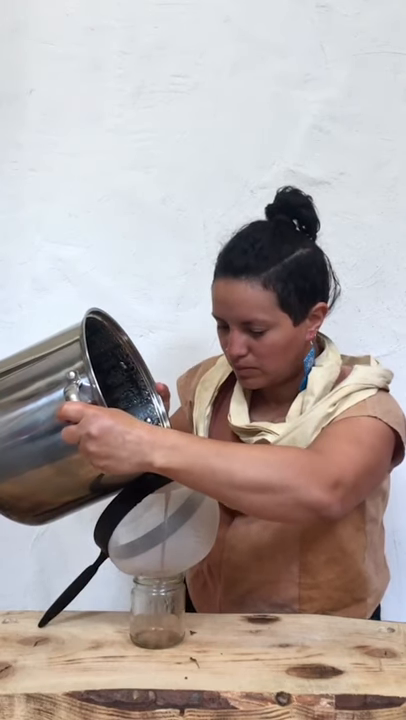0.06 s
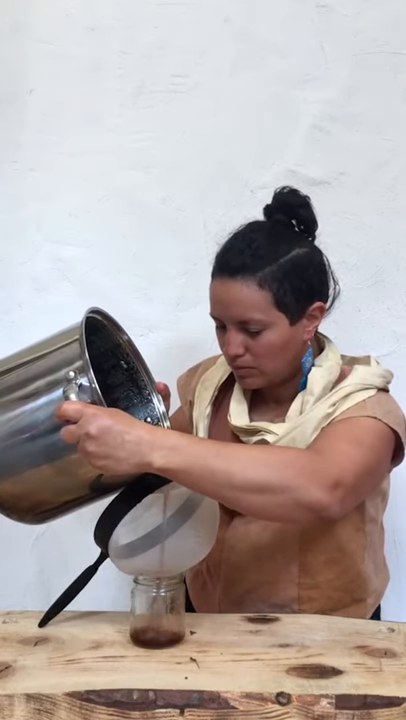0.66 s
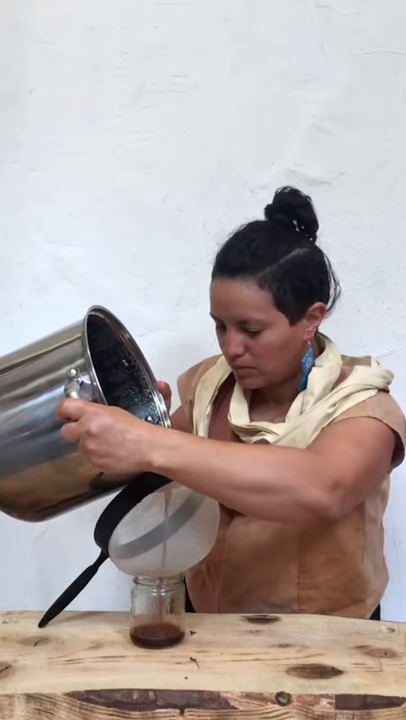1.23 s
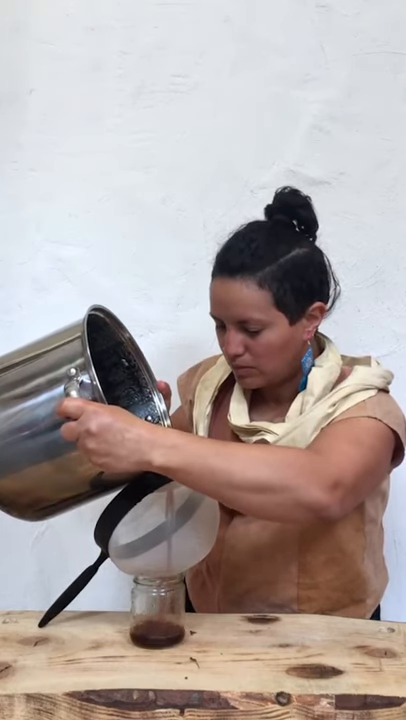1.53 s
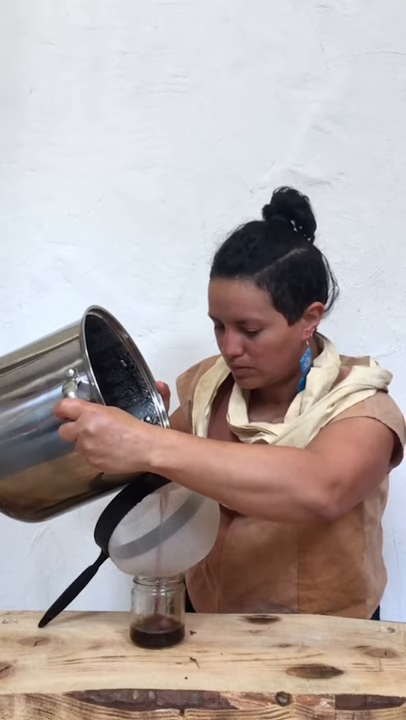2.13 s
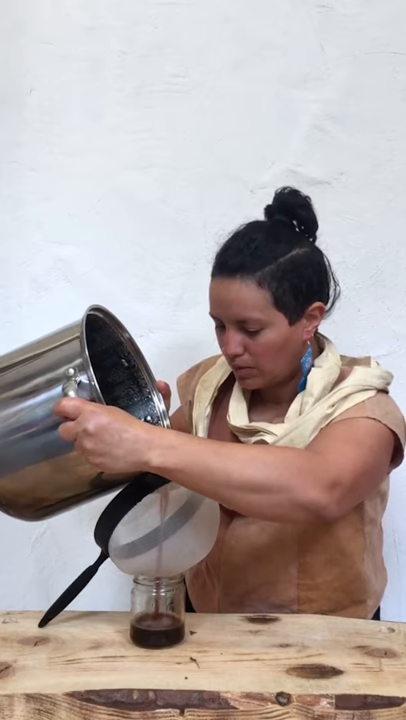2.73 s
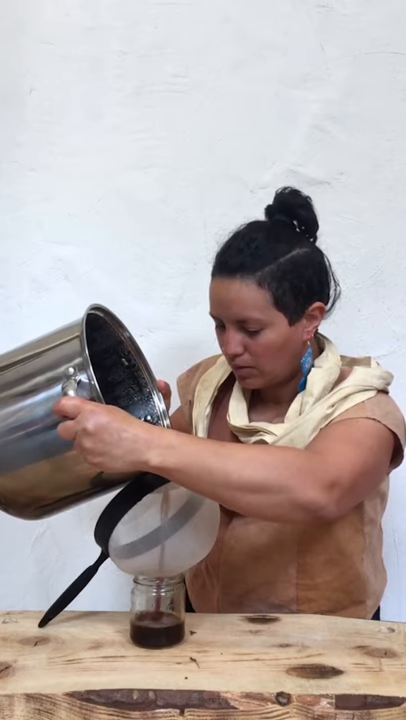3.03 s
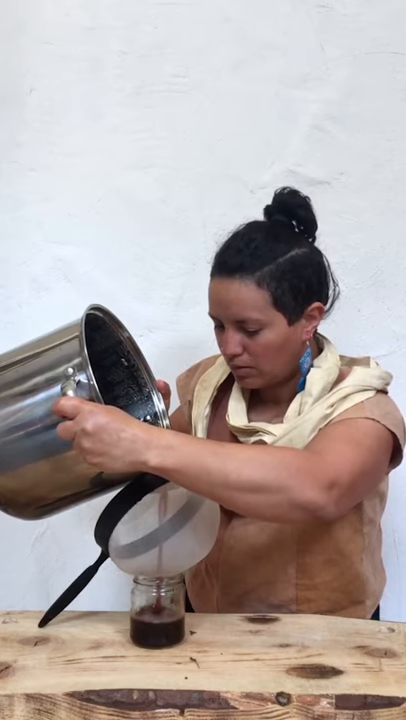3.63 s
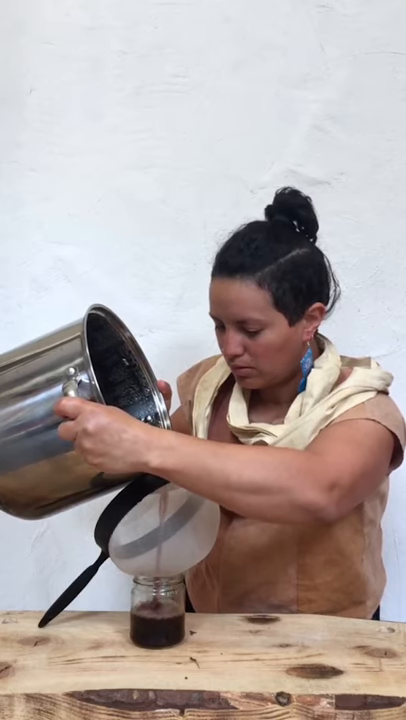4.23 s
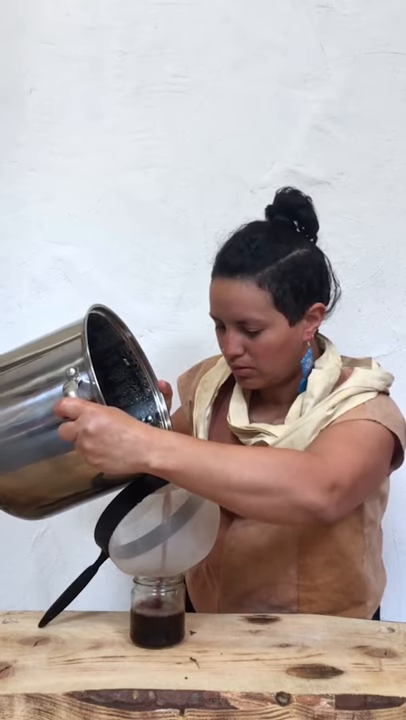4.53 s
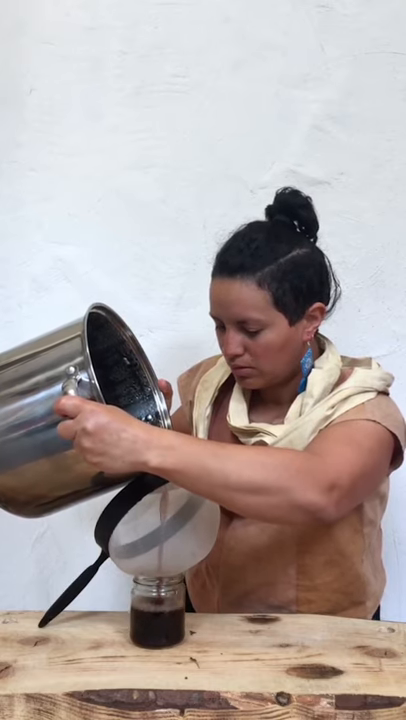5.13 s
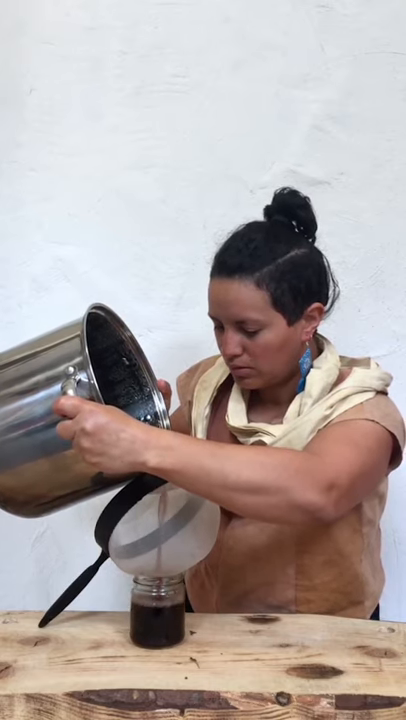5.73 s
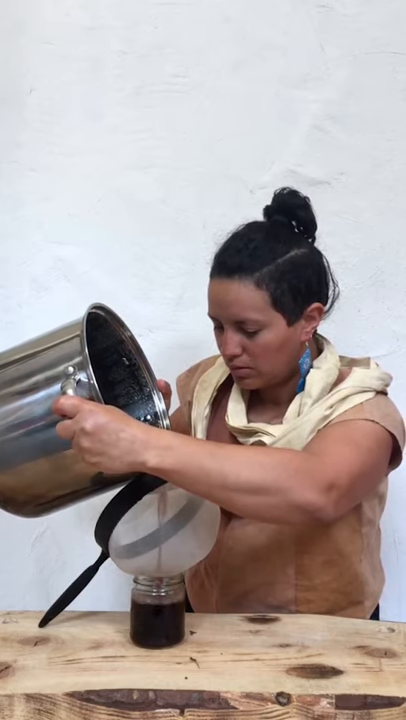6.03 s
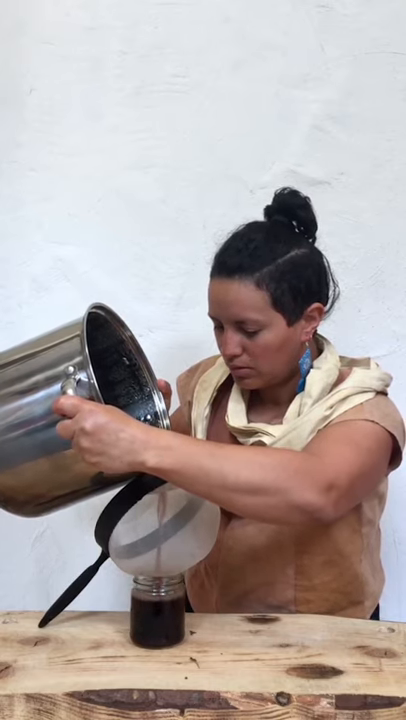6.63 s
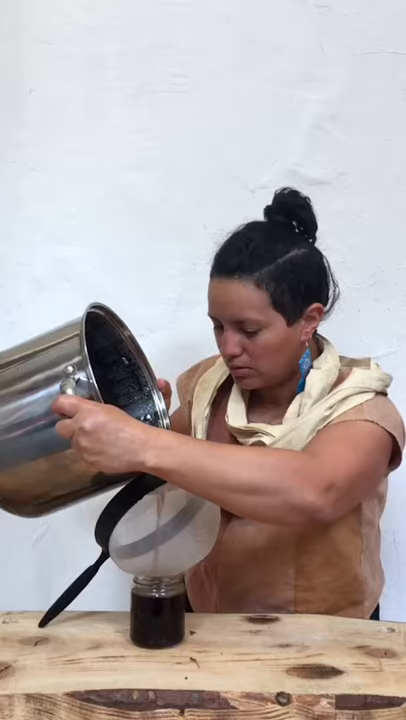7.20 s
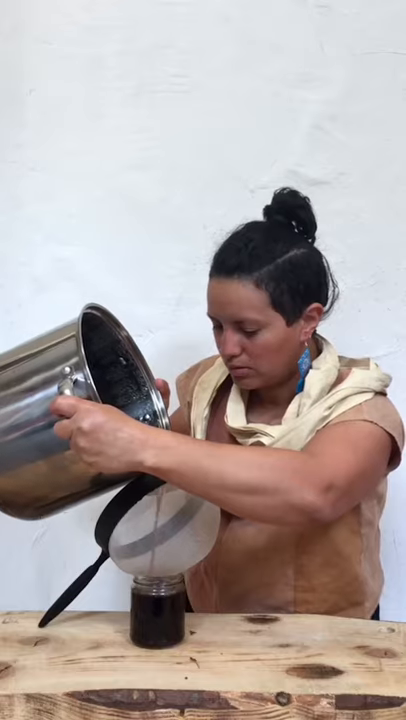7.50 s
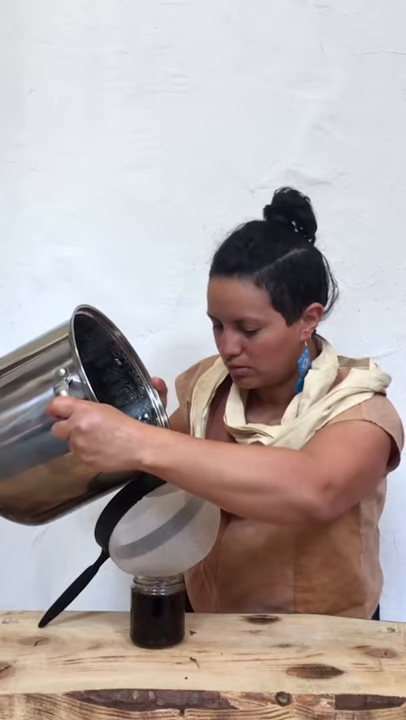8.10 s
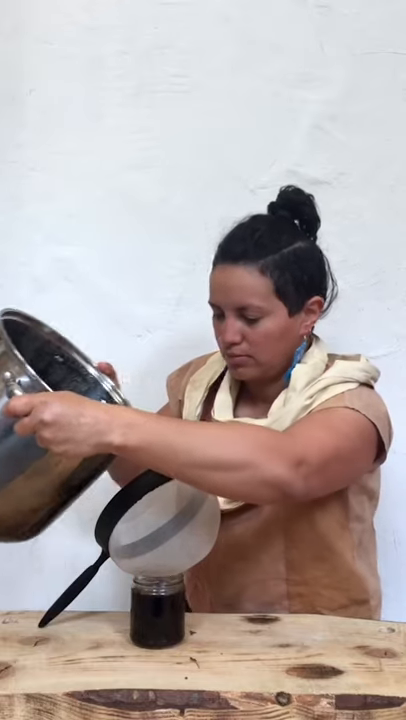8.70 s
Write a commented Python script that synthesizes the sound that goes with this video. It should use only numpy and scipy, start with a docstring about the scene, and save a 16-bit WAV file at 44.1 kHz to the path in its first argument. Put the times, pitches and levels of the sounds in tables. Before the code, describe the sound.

A thin stream of liquid pours from a steel pot through a strainer and funnel into a glass jar, heard close. It starts faintly, with light drops ticking from about 0.5 seconds and sharp, bright spatters on bare glass between 1.5 and 2 seconds. From about 2.2 seconds the pour is at its loudest, a quick run of hollow gulps and bubbles with a fine fizz, faint ringing from the jar and pot, and a soft low drumming. From around 4 seconds the gurgling gets lighter and its pitch climbs as the jar fills. After 6 seconds it thins to a trickle with high, plinking droplets. The stream falters near 7.2 seconds, gives a few last plops and drips, and dies away by 8 seconds. A faint low handling rumble follows around 8.5 seconds. Soft room noise and a slight electrical hum continue throughout.

```python
"""Pouring into a glass jar

A thin stream runs from a steel pot through a strainer and funnel into a jar on a wooden table.
It spatters on the bare glass, then traps air: each gulp rings a low hollow note and the shrinking
air space of the jar. Drops smack, small bubbles tick and fizz, and the pot rings along faintly.
The stream ends in a few drips. Behind it all is a quiet room with a mains hum."""
import sys
import numpy as np
from scipy import signal
from scipy.fft import rfft, irfft, next_fast_len
from scipy.io import wavfile
from scipy.ndimage import uniform_filter1d

SR = 44100
rng = np.random.default_rng(int(sys.argv[2]) if len(sys.argv) > 2 else 0)


def digitize_waveform(pressure):
    """Quantize a signal to 16-bit integers and store it at the path in sys.argv[1].

    Rows of a 2-D input are taken as channels; values are limited to [-1, 1].
    """
    field = np.atleast_2d(pressure).T
    bounded = np.clip(field, -1, 1)
    quanta = np.round(bounded * 32767).astype(np.int16)
    wavfile.write(sys.argv[1], SR, quanta)


N = 390726
TIME = np.arange(N) / SR
SWELL_S = .0008   # how quickly a gulp's ring builds up

# Gulps, the big trapped pockets of air:
# (time [s], low ring level [dB], high ring level [dB], low pitch [Hz], high pitch [Hz], low decay [s])
GULPS = [(0.6803, -46, -37, 756, 1320, 0.014), (1.483, -43, -37, 790.0, 1260, 0.0053),
         (1.6625, -31.5, -28.5, 800, 1136, 0.0074), (1.8883, -25.5, -24, 860, 1076, 0.0057),
         (1.971, -35, -29, 805, 1346, 0.013), (2.1216, -31, -38, 846, 1210, 0.013),
         (2.224, -36, -34.5, 855, 1055, 0.018), (2.23, -34, -31.5, 920, 1010, 0.016),
         (2.301, -13, -33, 869, 1025, 0.008), (2.3306, -28, -48, 878, 1080, 0.025),
         (2.362, -22.5, -44, 903, 1050, 0.012), (2.4133, -19, -29, 835, 1062, 0.012),
         (2.433, -15, -45, 795, 1050, 0.0065), (2.4641, -22.5, -46, 836, 1080, 0.012),
         (2.488, -18.5, -51, 850, 1020, 0.0073), (2.5184, -24.5, -49, 840, 1050, 0.011),
         (2.653, -22, -33, 833, 970, 0.013), (2.6852, -31, -54, 874, 1000, 0.019),
         (2.7477, -26.5, -39, 828, 1010, 0.024), (2.7678, -21, -48, 858, 1000, 0.008),
         (2.79, -24, -36, 848, 1030, 0.0087), (2.941, -31, -36, 820, 1005, 0.014),
         (2.9676, -21.5, -36, 890, 1025, 0.0072), (2.995, -29.5, -51, 882, 980, 0.016),
         (3.033, -17, -26, 785, 1050, 0.0068), (3.1404, -26, -33, 678, 950, 0.013),
         (3.1727, -18, -26.5, 670, 954, 0.0072), (3.1936, -35, -29.5, 693, 893, 0.022),
         (3.237, -30, -35, 658, 907, 0.03), (3.2824, -22, -29, 628, 940, 0.0081),
         (3.363, -23, -31, 750, 960, 0.014), (3.4023, -25.5, -23, 725, 934, 0.0067),
         (3.4124, -24, -32, 659.0, 887.0, 0.013), (3.443, -21, -40, 619, 950, 0.016),
         (3.498, -23, -39, 602, 1000, 0.01), (3.56, -30, -32.5, 675, 1000, 0.012),
         (3.575, -29, -31, 697, 1023, 0.011), (3.597, -37, -36, 710, 1050, 0.0097),
         (3.683, -22.5, -33.5, 662, 1023, 0.011), (3.712, -26, -37, 630, 940, 0.0055),
         (3.746, -32, -34.5, 610, 1000, 0.0078), (3.7768, -22, -26.5, 630, 1010, 0.009),
         (3.798, -28, -34, 610, 1210, 0.0086), (3.824, -32, -29.5, 590, 1055, 0.0089),
         (3.8354, -22, -27, 580, 1030, 0.012), (3.8549, -23.5, -34, 556, 1016, 0.008),
         (3.863, -30, -29.5, 608, 950, 0.02), (3.888, -30.5, -37, 606, 1014, 0.019),
         (3.986, -18, -29.5, 559, 1006, 0.0094), (4.029, -34, -33.5, 590, 1080, 0.0087),
         (4.048, -24, -34, 550, 1230, 0.0052), (4.0576, -28.5, -37, 591, 1040, 0.017),
         (4.105, -32, -22.0, 550, 1016, 0.0085), (4.1766, -33.5, -29.5, 587.0, 1080, 0.011),
         (4.275, -32, -29, 592, 1080, 0.012), (4.3393, -40, -32.5, 603, 1176, 0.011),
         (4.4317, -34.5, -28.5, 575, 1103, 0.029), (4.4643, -29, -26.5, 544, 1110, 0.011),
         (4.496, -43, -28, 540, 1076, 0.017), (4.563, -36, -33.5, 560, 1079, 0.035),
         (4.634, -28, -25, 518, 1180, 0.011), (4.6796, -28.5, -22, 560.0, 1082, 0.012),
         (4.744, -45, -36, 560, 1104, 0.024), (4.788, -45, -28.5, 560, 1144, 0.0097),
         (4.8215, -44, -29, 546, 1186, 0.016), (4.8395, -30.5, -27, 560, 1076, 0.0088),
         (4.887, -43, -29, 533.0, 1196, 0.0099), (4.957, -26.5, -26.5, 535, 1207, 0.011),
         (4.99, -45.0, -26.5, 604, 1274, 0.0075), (5.0245, -33, -33, 543, 1030, 0.0086),
         (5.0816, -35.5, -39, 574, 990, 0.019), (5.127, -38, -41, 584, 1350, 0.012),
         (5.1704, -30, -30.5, 553.0, 1250, 0.0093), (5.241, -31, -26, 525, 1050, 0.013),
         (5.257, -27, -30, 540, 1110, 0.0062), (5.304, -37, -42, 540, 1180, 0.01),
         (5.4175, -41, -33, 677, 1087, 0.017), (5.478, -31.5, -23.5, 580, 1286, 0.0063),
         (5.546, -37, -34, 638, 1312, 0.019), (5.6557, -32, -27, 560, 1280, 0.011),
         (5.685, -42, -34, 596, 1435, 0.011), (5.76, -37, -47, 573, 1320, 0.0054),
         (5.81, -26.5, -31.5, 574, 1400, 0.015), (5.85, -36, -21.5, 560, 1300, 0.0046),
         (6.533, -51, -27.5, 594, 1510, 0.0044), (6.594, -54, -32, 590, 1487, 0.011),
         (6.834, -57.0, -32.5, 614, 1620, 0.0063), (7.5234, -38, -42.5, 600, 1040, 0.01),
         (7.68, -34, -44.5, 611, 1040, 0.013), (7.7337, -26.5, -37, 670, 1030, 0.0083)]
# The funnel's hollow notes: (pitch [Hz], width [Hz], level [dB])
FUNNEL_NOTES = [(273, 34, 5.5), (306, 49, 17.5)]


def gulps(second_db=-18, snap_db=-23, jolt_db=-12, splash_db=-25):
    """Each air pocket snaps shut, rings two notes, jolts the funnel and throws up a little spray."""
    rings, jolts, splashes, snaps = np.zeros((4, N))
    for s, low_db, high_db, low_hz, high_hz, decay_s in GULPS:
        low_rise, high_rise = rng.normal(.3, 1.0, 2)
        add(rings, s, from_db(low_db) * plop(low_hz, decay_s, low_rise))
        add(rings, s, from_db(high_db) * plop(high_hz, .77 * decay_s, high_rise))
        # a smaller pocket pinches off just after the first
        lag_s = rng.uniform(.010, .026)
        detune = np.exp(rng.normal(0, .067))
        for db, hz in (low_db, low_hz), (high_db, high_hz):
            add(rings, s + lag_s, from_db(db + second_db) * plop(hz * detune, .008, 0))
        add(snaps, s + SWELL_S, from_db(max(low_db, high_db) + snap_db) * crackle(.0023))
        # the deepest gulps jolt the funnel hardest: 9 dB more for each octave down
        force_db = (low_db + high_db) / 2 - 9 * np.log2(low_hz / 560)
        add(jolts, s, from_db(force_db + jolt_db) * crackle(.015))
        add(splashes, s, from_db(high_db + splash_db + rng.normal(0, 3)) * crackle(.016))
    funnel = band(1.13 * body(jolts, FUNNEL_NOTES), 250, 410)
    splatter = band(splashes, 1500, 8000) + 2 * band(snaps, 1250, 2000)
    return band(rings, 260, 1960, order=3) + funnel + splatter


def lulls(depth_db=5, half_width_s=.016):
    """A volume curve: churn and fizz dip just before each gulp, while its pocket of air forms."""
    dips = np.zeros(N)
    for s, *_ in GULPS:
        add(dips, s - 2.7 * half_width_s, np.hanning(int(3 * half_width_s * SR)))
    return from_db(-depth_db * np.minimum(dips, 1))


# Notes of the air as the jar fills: (time [s], hollow note [Hz], jar air note [Hz], overtone [Hz])
FILLING_NOTES = [(1.9, 836, 1330, 2670), (2.35, 855, 924, 2960), (2.95, 831, 820, 3140),
                 (3.2, 728, 860, 3250), (3.6, 656, 856, 3570), (4.0, 575, 1137, 3130),
                 (5.0, 547, 1130, 2980), (5.35, 560, 1190, 3000), (5.5, 612, 1256, 3180),
                 (5.8, 565, 1270, 3070), (6.5, 633, 1550, 3190), (6.9, 597, 1670, 3240),
                 (7.15, 596, 2070, 2670), (7.45, 638, 1710, 2640), (7.8, 590, 1800, 2400)]
# How loud the bubbling between gulps is: (time [s], hollow note level [dB], jar air level [dB])
CHURN_LEVELS = [(1.3, -60, -65), (2.22, -42.5, -43), (2.47, -34.5, -57), (3.38, -39.5, -38),
                (3.54, -45.5, -42), (4.0, -45, -49.5), (4.13, -44.5, -47.5), (4.68, -39.5, -40.5),
                (5.2, -47.5, -45.5), (5.75, -46, -46), (5.99, -57.5, -56.5), (6.8, -59, -48.5),
                (7.39, -56.5, -51), (7.62, -46.5, -49), (7.9, -61, -52)]
# Bubbles get fewer once the stream thins: (time [s], bubbles [per s])
BUBBLE_RATE = [(5.7, 220), (6.2, 110)]
# How much of the stream reaches the pool; it falters before the last drips: (time [s], amount [share])
STREAM_FLOW = [(1.3, 0), (1.9, 0.87), (7.16, 0.8), (7.22, 0.29), (7.36, 0.25), (7.42, 0.81), (7.76, 0.7),
               (7.9, 0.13), (8.05, 0.05)]


def churn(air_gain_db=.5, overtone_db=-19):
    """Countless small bubbles keep the jar's air ringing; its note climbs and blurs as the jar fills."""
    hollow_hz, air_hz, overtone_hz = in_time(FILLING_NOTES)
    hollow_db, air_db = in_time(CHURN_LEVELS)
    per_s, = in_time(BUBBLE_RATE)
    flow, = in_time(STREAM_FLOW)
    blur = np.interp(TIME, [3.5, 6.0, 7.3], [.035, .055, .11])
    wander = np.interp(TIME, [2.9, 3.4], [.028, .058])
    bubbles = random_clicks(per_s, 3.0) * from_db(3 * wobble(20))
    hollow = from_db(hollow_db) * moving_ring(bubbles, hollow_hz * np.exp(wander * wobble(26.2)), 39.3)
    air = from_db(air_db + air_gain_db) * moving_ring(bubbles, air_hz * np.exp(blur * wobble(20.5)), 172)
    overtone = from_db(hollow_db + overtone_db) * moving_ring(random_clicks(300, 8.9), overtone_hz, 110)
    return flow * (lulls() * (hollow + air) + overtone)


# The loudest droplets and small bubbles: (time [s], level [dB], pitch [Hz])
DROPLETS = [(0.472, -41, 7030), (0.6557, -31.5, 3150), (0.78, -28.5, 4170), (0.784, -37, 6700),
            (0.872, -38, 9100), (0.9052, -35, 2070), (0.945, -39, 10750), (1.152, -36, 9950),
            (1.167, -30.5, 6880), (1.26, -36, 4100), (1.283, -35, 4420), (1.396, -34, 4100),
            (1.3974, -28, 7220), (1.433, -36, 6000), (1.485, -31.5, 7000), (1.5736, -23, 2760),
            (1.721, -23, 4260), (1.7477, -26, 2540), (1.849, -26, 7140), (1.9307, -32, 2860),
            (1.97, -32, 8560), (2.1145, -31.5, 4310), (2.155, -26.5, 6010), (2.361, -37, 3130),
            (2.5207, -29, 2830), (2.7811, -33.5, 3100), (2.8378, -32.5, 4430), (2.923, -36.5, 4550),
            (2.965, -31, 3125), (3.365, -36, 2850), (3.5771, -38, 4520), (3.5987, -34.5, 3360),
            (3.6292, -36, 3570), (3.712, -30.5, 3740), (3.7499, -36, 3930), (3.851, -38.5, 5540),
            (3.897, -42, 4750), (3.997, -35.5, 4860), (4.012, -32, 3230), (4.222, -36, 3050),
            (4.7606, -34, 4260), (5.415, -27.5, 3370), (5.479, -27, 2700), (5.662, -28, 2300),
            (5.69, -32.5, 3050), (5.695, -35.5, 6130), (5.8514, -31.5, 2660), (5.9263, -30, 1980),
            (6.1978, -28, 3030), (6.3595, -28, 3330), (6.3665, -29.5, 3730), (6.557, -26, 3710),
            (6.6342, -32, 3120), (6.6705, -34, 1705), (6.75, -28.5, 3310), (6.778, -32, 3400),
            (6.832, -36, 1930), (6.897, -28, 1870), (6.963, -26, 2560), (7.107, -25, 2460),
            (7.1447, -21.5, 2390), (7.428, -30.5, 3430), (7.4686, -22.5, 2440), (7.5008, -32.5, 3350),
            (7.545, -36, 1655), (7.5762, -42, 2380), (7.679, -24, 2405), (7.714, -30.5, 2350)]


def droplets(ring_s=.0068, swell_s=.00031, mouth_hz=3258):
    """A droplet cracks, splashes and leaves a tiny bubble; the jar and the air in its mouth ring too."""
    out = np.zeros(N)
    for s, db, hz in DROPLETS:
        bubble_rise, mouth_rise = rng.normal(0, 1, 2)
        crack = band(crackle(.0013), hz * .6, hz * 1.5)
        bubble = plop(hz, ring_s, bubble_rise, swell_s)
        mouth = plop(mouth_hz, ring_s, mouth_rise, swell_s)
        splash = band(crackle(.01, grain_db=8.5, swell_s=SWELL_S), hz * .77, hz * 1.235)
        after_ring = band(crackle(.014, swell_s=ring_s), hz * .905, hz * 1.08)
        for part, part_db in (crack, -9), (bubble, -6), (mouth, -16), (splash, -5), (after_ring, -3):
            add(out, s, from_db(db + part_db) * part)
    return out


# Drops smacking on bare glass or on the pool: (time [s], level [dB])
SMACKS = [(0.832, -22.5), (0.984, -37), (1.5435, -16.5), (1.574, -26), (1.728, -21), (1.889, -20),
          (2.0077, -26), (2.0252, -16.5), (2.054, -27), (2.086, -22.5), (3.4416, -30.5), (4.104, -20),
          (4.107, -26)]


def smacks(smack_s=.0032, spray_s=.0045, spray_db=-11):
    """A drop that bursts without trapping air gives a sharp tick with no pitch, and a short spray."""
    out = np.zeros(N)
    for s, db in SMACKS:
        add(out, s, from_db(db) * (crackle(smack_s) + from_db(spray_db) * crackle(spray_s)))
    return band(out, 2700, 5830)


# Fine droplets spitting against the glass: (time [s], level [dB])
SPITS = [(0.5512, -39), (0.697, -34.5), (0.870, -32), (0.899, -30), (1.015, -30), (1.4875, -30),
         (1.518, -24), (1.627, -21), (1.707, -25), (1.8795, -30), (2.1305, -32), (2.157, -36), (2.711, -36),
         (2.796, -35), (2.838, -31), (2.966, -32.5), (3.1977, -36), (3.35, -40), (3.624, -26), (3.776, -29),
         (4.06, -32), (4.236, -29), (4.577, -36), (4.989, -35), (5.124, -31), (5.3034, -28), (5.69, -38),
         (5.7592, -43), (5.849, -37), (6.343, -33)]


def spits(gain_db=-2):
    """Fine droplets hit the glass in bright clusters of tiny clicks."""
    clusters = np.zeros(N)
    for s, db in SPITS:
        add(clusters, s, from_db(db + gain_db) * crackle(.0069, grain_db=3.5, swell_s=.0013))
    return sizzle(clusters)


def sizzle(clicks, ping_hz=8840):
    """The finest spray sizzles very high up and pings the glass a little lower."""
    return band(clicks, 10170, 14200) + from_db(-.5) * resonate(clicks, ping_hz, 610)


# How loud the spray is: (time [s], fizz level [dB], spatter level [dB])
SPRAY_LEVELS = [(0.0, -67, -59), (1.32, -65.5, -57.5), (1.72, -45, -46), (1.98, -41.5, -52),
                (2.13, -50.5, -57), (2.4, -59.5, -67.5), (3.32, -55, -66), (3.67, -51, -56.5),
                (3.83, -51, -65), (4.4, -52.5, -66), (4.6, -54, -53.5), (4.75, -57, -68.5),
                (5.3, -51.5, -56.5), (5.52, -48, -56.5), (5.85, -52.5, -63), (7.2, -49, -59.5),
                (7.63, -44, -53), (7.9, -51, -49.5)]
# How hard the stream sprays; it weakens as the pot empties: (time [s], strength [factor])
SPRAY_STRENGTH = [(0, 0.2), (.25, 0.36), (.65, 1.09), (5.8, 0.68), (6.3, 0.79), (7.75, 0.37), (7.95, 0.061)]
# The fizz's mix of low and high pitches: (pitch [Hz], level [dB])
FIZZ_TONE = [(1000, -30), (1800, 8), (2200, 10), (2800, 12), (3500, 12.5), (4300, 10.5), (5100, 1.5),
             (5900, -2.5), (6800, -62), (9000, -30)]
# The same for the finer, brighter spatter: (pitch [Hz], level [dB])
SPATTER_TONE = [(4000, -20), (5500, -7), (7400, -12.5), (8600, -14.5), (9800, -17.5), (11600, -14),
                (15000, -22), (16000, -20)]


def spray(slap_db=-8, tick_db=-3, full_jar_top_hz=3740):
    """The stream fizzes, spatters and ticks, and slaps loudest while it still hits bare glass."""
    fizz_db, spatter_db = in_time(SPRAY_LEVELS)
    strength, = in_time(SPRAY_STRENGTH)
    bare_glass = np.interp(TIME, [2.1, 2.3], [1, .2])
    nearly_full = np.interp(TIME, [5.7, 6.6], [0, 1])
    hits = signal.fftconvolve(random_clicks(90, 3.0), crackle(.0012))[:N]
    slaps = steady(band(hits, 1700, 7200))
    fizz = tiny_bubbles(FIZZ_TONE, per_s=2800, spread_db=4.8, sharpness=13, clump_db=4.8)
    fizz += bare_glass * from_db(slap_db) * slaps
    # the short fall into a nearly full jar makes a duller fizz
    fizz = (1 - nearly_full) * fizz + nearly_full * band(fizz, 1530, full_jar_top_hz, order=3)
    spatter = tiny_bubbles(SPATTER_TONE, per_s=4000, spread_db=3.0, sharpness=16, clump_db=5.5)
    flecks = random_clicks(260, 3.3) * from_db(3 * wobble(8))
    ticks = sizzle(signal.fftconvolve(flecks, crackle(.0028, swell_s=.0012))[:N])
    spatter += from_db(tick_db) * unit_level(ticks)
    return strength * (from_db(fizz_db) * lulls() * fizz + from_db(spatter_db) * spatter)


def tiny_bubbles(tone, per_s, spread_db, sharpness, clump_db, sizes=16):
    """Each size of bubble rings at its own pitch, and bubbles of like size come in clumps."""
    clicks = random_clicks(per_s, spread_db)
    starts = np.flatnonzero(clicks)
    size_of = rng.integers(0, sizes, len(starts))
    shared_swell = wobble(12)
    out = np.zeros(N)
    for size, hz in enumerate(np.geomspace(tone[1][0], tone[-2][0], sizes)):
        own = starts[size_of == size]
        swell_db = clump_db * (.8 * shared_swell[own] + wobble(20)[own])
        struck = np.zeros(N)
        struck[own] = clicks[own] * from_db(at_hz(tone, hz) + swell_db)
        rings = resonate(struck, hz, hz / sharpness)
        out += resonate(rings, hz, hz / 4)   # rounds the start of each ring
    return steady(out)


# The glass jar's own notes: (pitch [Hz], width [Hz], level [dB])
JAR_NOTES = [(2500, 140, -13), (2850, 140, -6), (3090, 45, -3), (3480, 130, -4), (4400, 380, -4),
             (5430, 220, -10), (5870, 120, -11), (8550, 300, -8)]


def jar_ring(drops):
    """Drops and spray set the glass ringing."""
    return body(drops, JAR_NOTES)


# The steel pot's own notes: (pitch [Hz], width [Hz], level [dB])
POT_NOTES = [(582, 21.4, -6.5), (1026.7, 29.5, -2), (1079, 8.2, 1.5), (1228, 37.6, -1), (1397, 8.7, -6),
             (1503, 9.4, 0), (1649, 8.8, 4)]


def pot_ring(liquid, gain_db=6.5):
    """The steel pot rings along with the sound of the liquid."""
    return from_db(gain_db) * body(liquid, POT_NOTES)


# A gap in the tone that opens as the jar fills: (time [s], depth [share])
GAP_DEPTH = [(3.8, 0), (4.3, 1)]


def half_full_jar(pour, gap_hz=790, width_hz=205):
    """Once half full, the jar lets little sound through between its two air notes."""
    depth, = in_time(GAP_DEPTH)
    return pour - depth * resonate(pour, gap_hz, width_hz)


# The dull rumble under the pour: (time [s], level [dB])
RUMBLE_LEVELS = [(0, -70), (.65, -49), (1.2, -44.5), (1.9, -41.5), (2.65, -46.5), (3.0, -44), (4.2, -45.5),
                 (5.1, -53.5), (5.3, -67), (6.0, -60), (7.3, -56), (8.1, -72), (8.5, -47.5), (8.86, -56)]


def drumming(rumble_gain_db=-6):
    """The stream drums on the funnel; a lower rumble takes over as the pot is tipped back."""
    rumble_db, = in_time(RUMBLE_LEVELS)
    tipped = np.interp(TIME, [7.7, 8.2], [0, 1])
    drum = narrow_noise(60.8, 5.4)
    handling = narrow_noise(56.0, 8.2) + from_db(-6) * narrow_noise(103.8, 5.2)
    rumble = from_db(rumble_db + rumble_gain_db) * ((1 - tipped) * drum + tipped * handling)
    # the funnel's hollow murmur builds up, then eases as the stream thins
    murmur_level = np.interp(TIME, [0, .9], [.4, 1]) * from_db(-58.5 - 2.3 * TIME)
    return rumble + (1 - tipped) * murmur_level * narrow_noise(328, 85)


# Early echoes from the room's surfaces: (delay [s], level [dB])
ECHOES = [(.0139, -13), (.0282, -19)]


def room(x, scatter_db=-9, tail_db=-13, tail_s=.29, dull_hz=7000):
    """Table and funnel scatter the high sounds; two echoes and a short, smooth tail follow."""
    t = TIME[:SR // 2]
    scatter = rng.standard_normal(len(t)) * np.exp(-t / .0037) * (t > .002)
    tail = rng.standard_normal(len(t)) * from_db(-60 * t / tail_s) * (t > .012)
    echoes = from_db(scatter_db) * band(scatter / np.linalg.norm(scatter), 1150, 15000)
    echoes += from_db(tail_db) * tail / np.linalg.norm(tail)
    for delay_s, db in ECHOES:
        echoes[int(delay_s * SR)] -= from_db(db)
    return band(signal.fftconvolve(x, echoes)[:N], 170, dull_hz, order=1)


# The room noise's mix of low and high pitches: (pitch [Hz], relative level [dB])
ROOM_TONE = [(15, -36), (25, -17), (55, -5), (110, -4), (170, -7), (250, -9.5), (450, -12.5), (660, -12),
             (850, -13.5), (1500, -16.5), (2300, -18), (3400, -19), (9500, -28.5), (15800, -31)]


def room_noise(level_db=-57.33):
    """A soft, steady rush; level_db sets how loud its part above 400 Hz is."""
    size = next_fast_len(N)
    hz = np.arange(size // 2 + 1) * SR / size
    spectrum = rfft(rng.standard_normal(size)) * from_db(at_hz(ROOM_TONE, hz))
    upper_level = np.std(irfft(spectrum * (hz > 400), size))
    return from_db(level_db) * irfft(spectrum, size)[:N] / upper_level


# The tones of the mains hum: (pitch [Hz], level [dB])
HUM_TONES = [(100, -69), (200, -61.5), (300, -71)]


def mains_hum():
    """Mains electricity hums in three low, steady tones."""
    return sum(np.sqrt(2) * from_db(db) * np.sin(2 * np.pi * (hz * TIME + rng.random()))
               for hz, db in HUM_TONES)


def plop(hz, decay_s, rise_per_s, swell_s=SWELL_S):
    """A bubble's gliding note: it swells, holds a moment and is choked as the pocket closes."""
    t = TIME[:SR // 12]
    loudness = (1 - np.exp(-t / swell_s)) ** 2 * np.exp(-(t / decay_s) ** 2)
    return loudness / loudness.max() * np.sin(2 * np.pi * hz * (t + rise_per_s * t * t / 2))


def crackle(decay_s, grain_db=0.0, swell_s=.00021):
    """A quick cluster of tiny clicks that swells and dies."""
    t = TIME[:SR // 8]
    clicks = rng.standard_normal(len(t)) * from_db(grain_db * rng.standard_normal(len(t)))
    return unit_level(clicks) * (1 - np.exp(-t / swell_s)) * np.exp(-t / decay_s)


def random_clicks(per_s, spread_db):
    """Clicks at random times, many small and a few large."""
    sizes = from_db(spread_db * np.minimum(rng.exponential(1, N), 4))
    return (rng.random(N) < per_s / SR) * sizes * rng.choice([-1, 1], N)


def wobble(rate_hz, step=40):
    """A smooth random curve that strays about 1 either side of zero."""
    r = np.exp(-2 * np.pi * rate_hz * step / SR)
    slow = signal.lfilter([1], [1, -2 * r, r * r], rng.standard_normal(N // step + 502))[500:]
    return np.interp(np.arange(N) / step, np.arange(len(slow)), unit_level(slow))


def moving_ring(clicks, hz, width_hz):
    """Clicks ring one note whose pitch follows the curve hz."""
    turn = np.exp(2j * np.pi * np.cumsum(hz) / SR)
    slow, fast = np.exp(-np.pi * width_hz / SR), np.exp(-np.pi * 3 * width_hz / SR)
    # shift the note down to 0 Hz, smooth it twice, then shift it back up
    held = signal.lfilter([1], [1, -slow - fast, slow * fast], clicks / turn + 1e-18)
    return steady((held * turn).real, span_s=.25)


def narrow_noise(hz, width_hz):
    """One note shaken at random, at a steady overall level."""
    shaken = resonate(rng.standard_normal(N), hz, width_hz)
    return steady(resonate(shaken, hz, width_hz))


def resonate(x, hz, width_hz):
    """Let x ring one note; the smaller the width, the longer it rings."""
    r = np.exp(-np.pi * width_hz / SR)
    feedback = [1, -2 * r * np.cos(2 * np.pi * hz / SR), r * r]
    return signal.lfilter(np.array([1, 0, -1]) * (1 - r * r) / 2, feedback, x + 1e-18)


def body(x, notes):
    """All the notes an object gives back when x shakes it."""
    return sum(from_db(db) * resonate(x, hz, width_hz) for hz, width_hz, db in notes)


def band(x, low_hz, high_hz, order=2):
    """Keep the pitches between low_hz and high_hz."""
    edges = [low_hz, min(high_hz, SR / 2 - 500)]
    return signal.sosfilt(signal.butter(order, edges, "band", fs=SR, output="sos"), x + 1e-18)


def steady(x, span_s=.4):
    """Even out slow changes in level and keep the fast flicker."""
    size = int(span_s * SR / 2)
    power = uniform_filter1d(uniform_filter1d(x ** 2, size), size)
    return x / np.sqrt(np.abs(power) + 1e-14)


def unit_level(x):
    """Scale x to an average (rms) level of 1."""
    return x / np.sqrt(np.mean(x ** 2) + 1e-20)


def from_db(db):
    """Turn decibels into a number to multiply by."""
    return 10 ** (np.asarray(db) / 20)


def in_time(rows):
    """Join a table's timed rows with straight lines, one curve for each value column."""
    times, *columns = np.transpose(rows)
    return [np.interp(TIME, times, column) for column in columns]


def at_hz(tone, hz):
    """Look up a tone table's level in dB at any pitch."""
    pitches, levels = np.transpose(tone)
    return np.interp(np.log(hz + 1e-9), np.log(pitches), levels)


def add(out, s, sound):
    """Mix a sound in, starting s seconds from the beginning."""
    at = max(int(s * SR), 0)
    out[at:at + len(sound)] += sound[:N - at]


def scene(pour_db=-1.5):
    """The liquid sounds in the jar, the pot answers, and the room surrounds both."""
    drops = droplets() + smacks() + spits() + spray()
    liquid = gulps() + churn() + drops + jar_ring(drops)
    pour = half_full_jar(liquid + pot_ring(liquid))
    mix = from_db(pour_db) * (pour + room(pour)) + drumming() + room_noise() + mains_hum()
    return mix[None]


def record(dry, cutoff_hz=15950):
    """Cut off the very highest pitches steeply."""
    return signal.sosfilt(signal.ellip(12, .1, 80, cutoff_hz, fs=SR, output="sos"), dry)


dry = scene()
out = record(dry)
digitize_waveform(out)
```